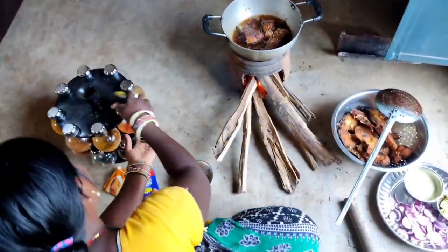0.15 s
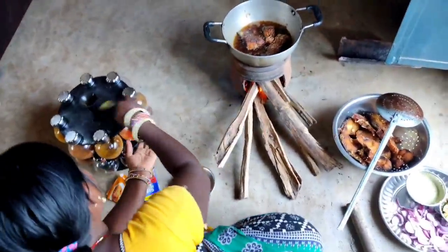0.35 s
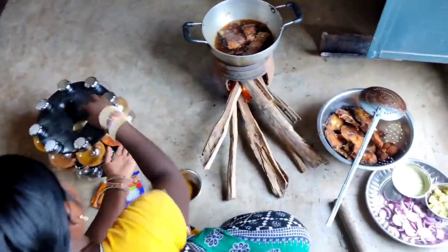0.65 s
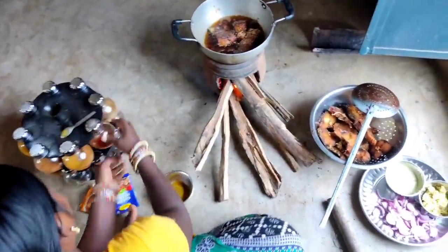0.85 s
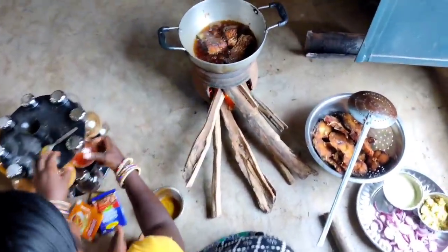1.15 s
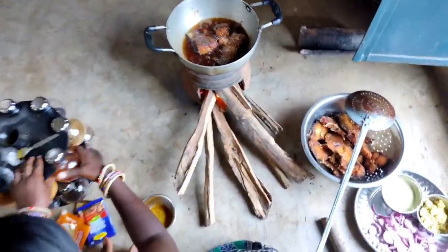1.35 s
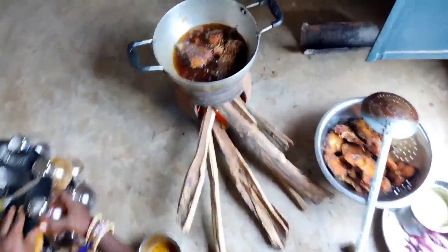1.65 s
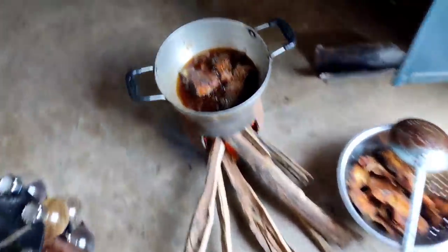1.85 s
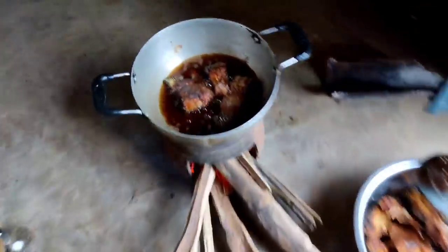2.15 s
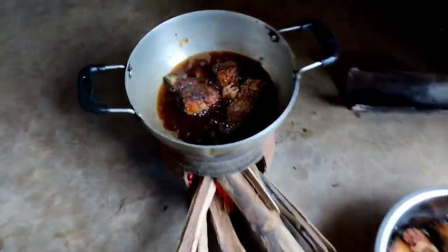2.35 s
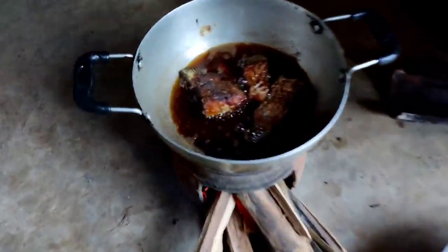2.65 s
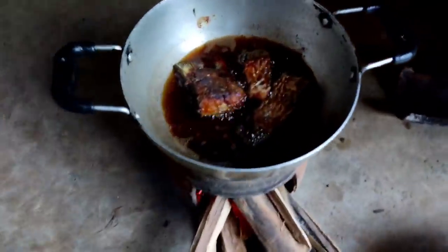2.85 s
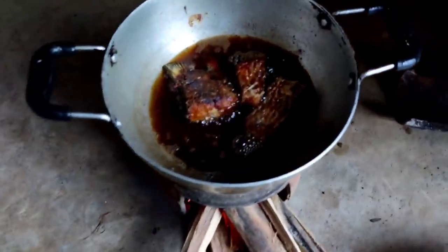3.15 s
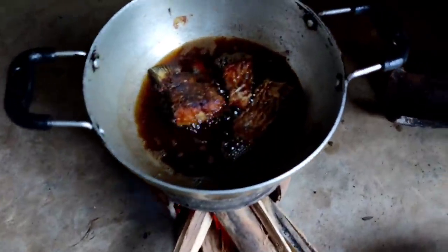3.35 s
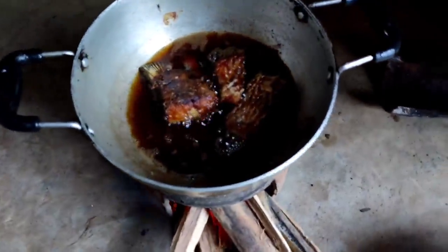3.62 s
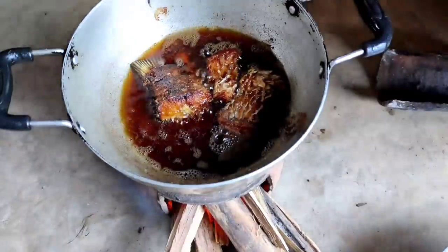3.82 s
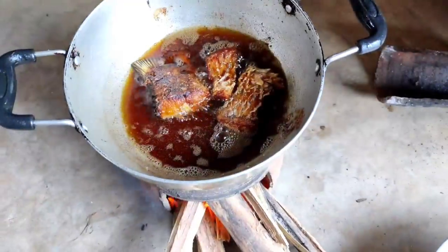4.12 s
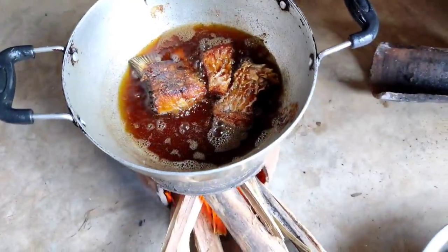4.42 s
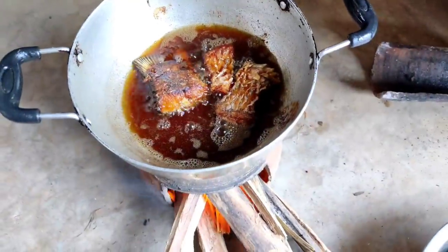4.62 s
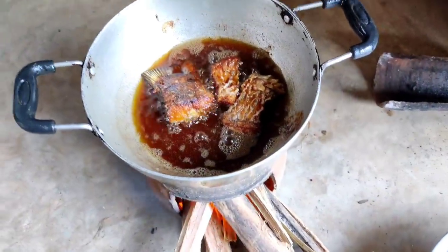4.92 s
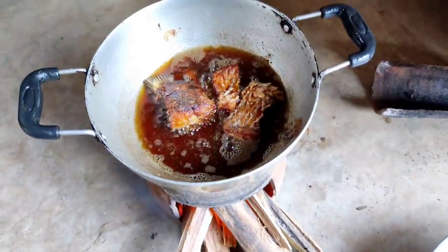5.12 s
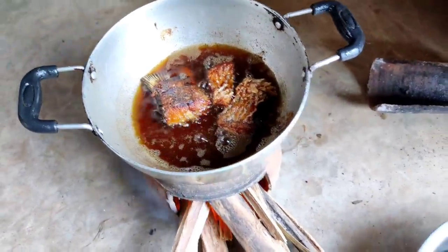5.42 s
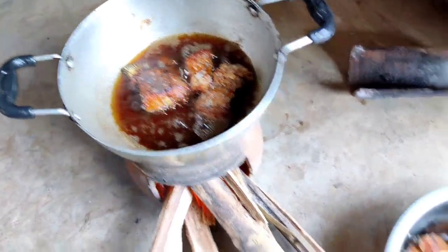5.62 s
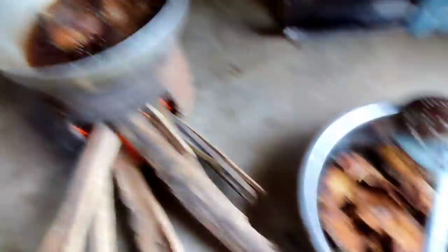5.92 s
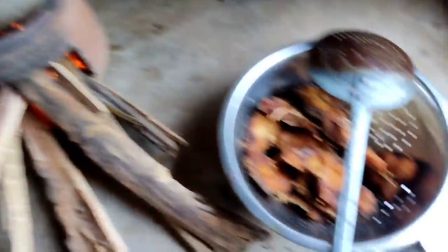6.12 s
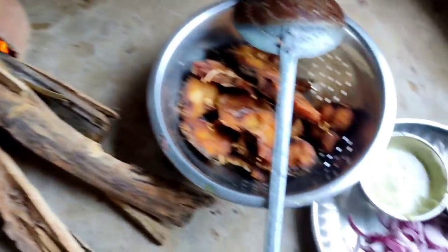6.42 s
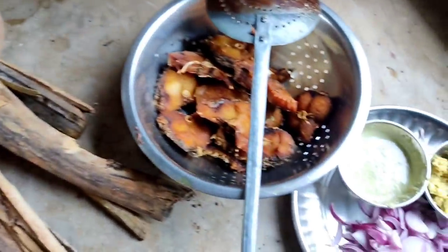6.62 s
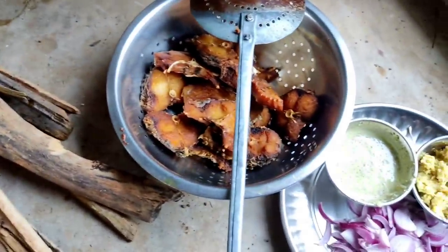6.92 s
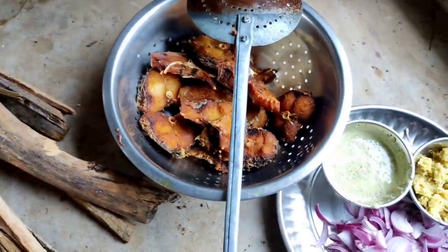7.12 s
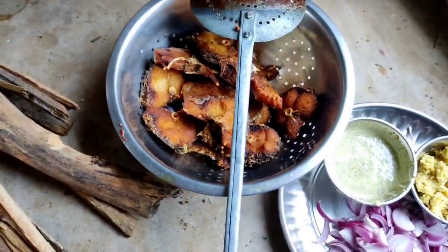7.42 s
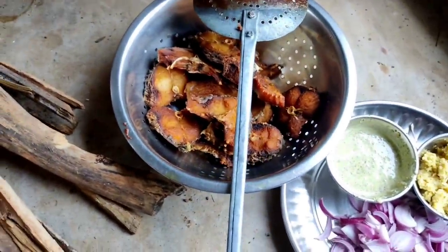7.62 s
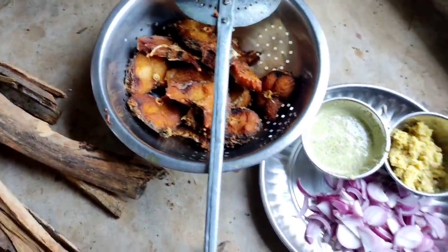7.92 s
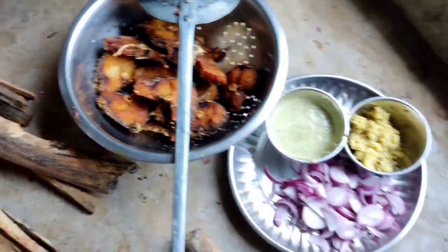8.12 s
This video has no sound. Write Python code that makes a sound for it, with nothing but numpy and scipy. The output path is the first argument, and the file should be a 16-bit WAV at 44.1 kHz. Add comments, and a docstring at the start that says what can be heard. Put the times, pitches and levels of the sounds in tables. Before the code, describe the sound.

Fish fries in a pot of hot oil, with a fine fizz, crackle and single bubbles popping throughout. Steel spice tins clink and rattle nearby in the first couple of seconds. The wood fire snaps three times, and a steel dish is faintly tapped near the end. The hand-held microphone moves closer to the pot and away in a bare kitchen, catching low puffs of air on the left midway.

```python
"""A bare kitchen: fish fries in a pot of hot oil, with fine fizz, crackle and single bursting bubbles.
The wood fire snaps. Steel spice tins clink and rattle nearby; a steel dish is touched.
A hand-held recorder with two spaced ports moves closer to the pot and away again.
Moving air buffets the left port, over a low murmur of fire and house."""
import sys
import numpy as np
from scipy import signal
from scipy.io import wavfile
from scipy.ndimage import uniform_filter1d, map_coordinates

SR = 44100
rng = np.random.default_rng(int(sys.argv[2]) if len(sys.argv) > 2 else 0)


def transcribe(u):
    """Save the signal u as a 16-bit wav file named by the first command-line argument.

    u: samples, shape (n,) or (channels, n), limited to [-1, 1]; the rate is SR.
    q: integer samples, one column per channel.
    """
    v = np.clip(np.atleast_2d(u).T, -1, 1)
    q = np.round(v * 32767).astype(np.int16)
    wavfile.write(sys.argv[1], SR, q)


N = 364354

# Spectra. Each row: frequency in Hz, relative density in dB.
ROOM_TONE_SPECTRUM = [(12, -47), (20, 19.5), (59, -4), (122, -12), (187, -0.5), (333, -4.5), (529, 0.5),
                      (749, -12.5), (1440, -20.5), (2600, -19.5), (4400, -120)]
WOOD_SPECTRUM = [(300, -9), (1500, -1), (3000, -6.5), (5000, -5), (7700, 14), (10000, 6), (13000, 3),
                 (16000, 11.5)]
CLATTER_SPECTRUM = [(500, -21), (900, -19), (1400, 5), (2800, -0.5), (4300, -6.5), (5700, -8.5), (7500, -4),
                    (9300, -10), (15500, -37)]
FIZZ_SPECTRUM = [(500, -38), (900, -16), (1700, -37), (2500, -0.5), (3300, -4.5), (4800, -3.5),
                 (6000, -4.5), (7700, 5.5), (9100, -1), (12000, -7), (15500, -46)]
CRACKLE_SPECTRUM = [(250, -56), (500, 2), (1100, -10.5), (2300, -6), (3500, -6), (5500, -7), (7700, 2),
                    (9200, 0), (15500, -30)]
SLAP_SPECTRUM = [(500, -6.5), (1000, 2.5), (2200, 7), (4000, -3), (6000, -11), (12000, -32)]
SPIT_SPECTRUM = [(3000, -45), (5000, -24), (6500, -10), (7700, 0), (8800, -5), (11000, -15), (16000, -30)]

# Air on the left port. Each row: time in seconds, rumble level in dB.
RUMBLE_LEVEL = [(0.0, -56), (0.85, -62), (1.1, -58.5), (2.51, -34.5), (2.64, -50), (2.92, -24), (3.01, -40),
                (3.26, -46), (4.51, -29), (4.71, -36.5), (5.17, -32), (5.52, -48.5), (5.71, -36.5),
                (5.86, -40), (6.03, -27.5), (6.26, -48), (6.37, -33.5), (6.65, -52.5), (8.26, -55.5)]
# Single eddies. Each row: start in seconds, level in dB, nominal pitch in Hz, t60 in seconds.
BUFFETS = [(1.901, -32, 167, 0.94), (1.97, -11.5, 134.6, 0.064), (2.135, -14, 280, 0.025),
           (2.256, -15, 188, 0.071), (2.385, -18.5, 208, 0.27), (2.499, -20, 174, 0.11),
           (2.793, -20, 204, 0.12), (2.894, -10.5, 148, 0.075), (3.916, -12, 141, 0.066),
           (4.305, -25, 200, 0.1), (4.415, -19, 223, 0.5), (4.459, -13.5, 194, 0.19),
           (4.641, -10.5, 256, 0.15), (4.841, -25, 166.5, 0.15), (4.969, -12, 198, 0.1),
           (5.189, -12, 195, 0.1), (5.336, -12, 229, 0.072), (5.718, -15, 165, 0.12),
           (6.025, -2.5, 207.5, 0.064), (6.338, -30.5, 185, 0.23)]
# Burning wood. Each row: start in seconds, peak in dB, left minus right in dB.
WOOD_SNAPS = [(2.4211, -8.5, -22.5), (4.701, -11, 18), (6.1089, 3, -10)]
# Touches on the dish. Each row: start in seconds, rim level in dB, belly level in dB.
DISH_TAPS = [(7.188, -37, -55), (7.218, -31, -59), (7.91, -43, -48), (7.945, -39, -41), (8.228, -35, -69)]
# Dish modes. Each row: frequency in Hz, t60 in seconds.
DISH_RIM, DISH_BELLY = [(2400, 0.038)], [(330, 0.21), (400, 0.14)]
# Tins knocked. Each row: start in seconds, level in dB, relative tray drive in dB,
# left minus right in dB, relative steel drive in dB, tick pitch in Hz.
TIN_KNOCKS = [(0.6695, -31, 2, -4, -3, 7600), (0.7158, -9.5, -10, -2, 1, 7000),
              (0.7328, -18, -9, 6, 2, 2800), (0.8358, -24, -23, 1, -4, 2800),
              (1.3326, -34, -6, -7, 0, 4000), (1.4095, -22, 6, -8, -7, 7400),
              (1.4723, -28, 14, -1.5, -15, 2800), (2.1302, -20, -1, -2, -34, 2300),
              (2.1501, -17.5, 8.5, 0, -26, 2100), (2.2007, -37.5, 23.5, 4, -10, 2000)]
# Tins rattling on. Each row: start in seconds, level in dB, t60 in seconds, relative tray drive in dB.
TIN_RATTLES = [(0.669, -43, 0.07, 25), (0.714, -30.5, 0.089, 9.5), (0.772, -38, 0.49, 6),
               (1.331, -35, 0.2, -2), (1.408, -47.5, 0.89, 10.5), (2.127, -29, 0.21, 8),
               (2.2, -52, 4.3, 13.5)]
# Steel modes. Each row: frequency in Hz, weight in dB, nominal ring time in seconds.
TIN_MODES = [(1490, -9, .1), (2830, -3, .1), (3332, -15, .2), (4237, -11, .08), (4899, -12, .12),
             (5491, -4, .2), (6150, -8, .08), (6638, -7, .11), (6907, -2.5, .36), (7499, -10, .2),
             (7741, -9, .2), (8296, -6, .1), (8770, -10, .14), (9373, -12, .3), (10220, -4, .3),
             (11050, -5, .3), (14200, -17, .2)]
# Tray under the tins. Each row: frequency in Hz, width in Hz, gain in dB.
TRAY_MODES = [(190, 70, -10), (260, 50, -10), (465, 70, -9), (528, 60, -1), (705, 90, -10), (850, 120, -11)]
# Fizz as the recorder moves. Each row: time in seconds, level in dB.
FIZZ_LEVEL = [(0, -56.5), (1, -55), (1.8, -57), (2.6, -56.5), (3.5, -53.5), (4.3, -57), (5, -59),
              (5.6, -58), (6.5, -60), (7.4, -60), (8.26, -55.5)]
# Crackle flurries as water boils out of the fish. Each row: start in seconds, level in dB, t60 in seconds.
SPATTERS = [(2.885, -24.5, 0.12), (6.2, -46, 0.63), (6.49, -42, 0.32), (7.91, -52, 0.87), (8.2, -55, .4)]
# Bursting bubbles. Each row: start in seconds, ring peak in dB, ring pitch in Hz, slap peak in dB,
# spit peak in dB, left minus right in dB.
BURSTS = [(0.058, -32, 2000, -27.5, -51, -2), (0.256, -28.5, 5000, -31.5, -30, -2),
          (0.344, -41.5, 614, -39, -26, 4), (0.413, -34, 1680, -27.5, -40, -3),
          (0.468, -31.5, 495, -59, -57, 7), (0.945, -50, 549, -28.5, -36, -1),
          (1.065, -31, 1790, -35.5, -44, 2), (1.141, -31, 1490, -27.5, -33, 3.5),
          (1.235, -27, 2440, -30.5, -49, 2), (1.317, -29, 1790, -27, -33, -3),
          (1.543, -34.5, 590, -28, -26.5, -5), (1.616, -47, 1760, -24.5, -33, -5.5),
          (1.675, -19.5, 1400, -19.5, -36, -0.5), (1.733, -27.5, 1950, -24.5, -31.5, -6.5),
          (2.092, -31, 1490, -48, -60, 2), (2.261, -32, 5070, -25.5, -32, 2),
          (2.422, -26.5, 470, -24, -28, -14.5), (2.515, -27, 1980, -34, -50, 5),
          (2.53, -19.5, 1740, -29, -33.5, -1), (2.584, -40, 574, -27.5, -31, 7),
          (2.653, -37, 2500, -30, -36, 7), (2.698, -20, 1520, -34, -50, -1.5),
          (2.719, -38, 2090, -26, -39, -2), (2.883, -16.5, 2080, -23, -30, 0),
          (2.9, -15.5, 2120, -21.5, -16.5, -4), (2.915, -13, 1920, -17.5, -22, 1),
          (2.983, -36, 1290, -24, -52, -2), (2.995, -24, 440, -29, -40, 4.5),
          (3.041, -42, 875, -35, -28.5, -8), (3.159, -26, 443, -28, -52, 5.5),
          (3.267, -40, 417, -31, -31, -1), (3.298, -30.5, 990, -28, -52, 3), (3.42, -34, 1510, -25, -37, 0),
          (3.426, -33, 2000, -21, -23, -1), (3.481, -30.5, 1066, -19.5, -56, -2),
          (3.515, -34, 420, -23.5, -48, 2), (3.62, -62, 477, -53, -23.5, 9),
          (3.672, -18, 1750, -22.5, -36, -2.5), (3.774, -26.5, 3500, -31, -29.5, -4.5),
          (3.835, -36.5, 705, -37, -35, 4), (3.896, -30, 2240, -27.5, -49, 3),
          (3.93, -30, 2350, -49, -42, -13), (3.974, -16.5, 1730, -19.5, -29, -0.5),
          (4.043, -28.5, 430, -31, -38, 7), (4.105, -31.5, 520, -25.5, -49, 4),
          (4.167, -31, 2840, -26.5, -31, -9.5), (4.249, -64, 630, -36.5, -29, -9),
          (4.324, -39, 503, -26.5, -28, 0), (4.386, -29.5, 2760, -39, -28, -8),
          (4.4, -28, 674, -13.5, -47, 0), (4.45, -24.5, 1760, -36, -50, -5),
          (4.522, -27, 2770, -30, -34, -5), (4.688, -32.5, 1220, -33, -39, -6),
          (4.701, -33, 494, -22, -22, -1), (4.787, -21.5, 1340, -24, -31, -6.5),
          (4.799, -28.5, 1880, -29, -39.5, 16.5), (4.927, -35.5, 2000, -47, -54, -9),
          (5.081, -22, 647, -28, -29.5, 6), (5.099, -32, 890, -40, -42.5, -5),
          (5.159, -55, 640, -24, -20, 6), (5.286, -37, 520, -29, -38, -7),
          (5.329, -41, 454, -26, -33, -3.5), (5.383, -53, 2000, -45, -30, -3),
          (5.484, -24, 4930, -49, -20, 4), (5.497, -30, 1460, -28.5, -37, -3),
          (5.659, -39, 700, -25.5, -31, 2), (5.669, -31, 2220, -38, -40, -18),
          (5.734, -25.5, 1570, -25.5, -34, -3), (5.746, -22, 2160, -25, -17.5, 0),
          (5.804, -39.5, 500, -25, -29, 3), (5.974, -32.5, 4200, -31, -41, -6.5),
          (6.108, -37, 2020, -24, -15, 1.5), (6.154, -29.5, 2100, -44, -39, -7),
          (6.211, -36, 2300, -31, -27, -2), (6.237, -35.5, 790, -28.5, -28, -2),
          (6.398, -38, 1990, -34.5, -49, -7), (6.488, -26.5, 2000, -29, -38, -3),
          (6.493, -24.5, 486, -49, -42, 0.5), (6.534, -35.5, 560, -26, -40, -2),
          (6.651, -34.5, 855, -36.5, -52, 2), (6.689, -37, 525, -30, -37, -2.5),
          (6.797, -38.5, 3640, -41, -32, -4), (6.824, -38, 2680, -34, -32, -3),
          (6.882, -35.5, 5840, -36, -48, -3), (6.981, -33.5, 1810, -35, -42, -2),
          (7.088, -43, 520, -29.5, -36, 2), (7.187, -28.5, 1900, -28, -28.5, -3),
          (7.303, -36, 2730, -35, -36.5, 0), (7.388, -38, 526, -26.5, -24.5, -3.5),
          (7.548, -44, 550, -67, -26.5, 8), (7.639, -34.5, 543, -31.5, -35, 1),
          (7.909, -35, 440, -30, -39, 2), (7.942, -31, 3050, -29.5, -47, -8),
          (7.999, -37, 1980, -24, -25, -2), (8.085, -34, 610, -33.5, -40, 5),
          (8.22, -30, 2280, -25, -34, -1)]

# Distance from the pot, heard as echo. Each row: time in seconds, echo offset in dB.
DISTANCE_ECHO = [(0, 3.5), (1.8, -1.5), (5.6, 1), (6.3, 6.5), (8.26, 3)]
# Kitchen decay. Each row: frequency in Hz, t60 in seconds.
KITCHEN_T60 = [(300, 0.35), (1500, 0.28), (5000, 0.31), (10000, 0.25)]
# Arrival at the ports. Each row: time in seconds, left delay in ms.
PORT_LAG = [(0, 0.039), (.75, 0.26), (1.7, 0.14), (2.2, 0.46), (3.0, 0.13), (5.7, 0.17), (6.3, 0.39),
            (8.3, 0.44)]
# Shading by the recorder's body. Each row: frequency in Hz, left minus right in dB.
PORT_SHADING = [(300, 0), (1300, 3.5), (2400, -1.5), (4400, -7), (8000, -5.5), (15000, 15.5)]
# Treble loss of the ports. Each row: frequency in Hz, gain in dB.
PORT_RESPONSE = [(9300, 2), (9800, -8.5), (11000, -10), (15000, -16.5)]


def amp(db):
    """Decibels to gain."""
    return 10 ** (np.asarray(db) / 20)


def unit_rms(x):
    """Scales to rms 1."""
    return x / np.sqrt(np.mean(x ** 2) + 1e-20)


def unit_peak(x):
    """Scales to peak 1."""
    return x / abs(x).max()


def at_hz(points, hz):
    """Table lookup on a log frequency axis."""
    points_hz, value = np.transpose(points)
    return np.interp(np.log(hz + 1), np.log(points_hz + 1), value)


def curve(points):
    """Time table to one value a sample."""
    return np.interp(np.arange(N) / SR, *np.transpose(points))


def add(mix, start_s, sound):
    """Mixes a sound in, in place."""
    part = mix[..., round(start_s * SR):][..., :sound.shape[-1]]
    part += sound[..., :part.shape[-1]]


def panned(x, pan_db):
    """Left and right pair; positive is left."""
    return amp(np.array([[pan_db], [-pan_db]]) / 2) * x


def coloured(x, spectrum, size=4096):
    """Minimum-phase filter with the given spectrum."""
    gain_db = np.maximum(at_hz(spectrum, abs(np.fft.fftfreq(size, 1 / SR))), -100)
    response = np.exp(np.conj(signal.hilbert(np.log(amp(gain_db)))))
    taps = np.fft.ifft(response).real[:size // 2]
    return signal.oaconvolve(x, taps.reshape((1,) * (x.ndim - 1) + (-1,)), axes=-1)[..., :x.shape[-1]]


def resonate(x, hz, width_hz):
    """Two-pole resonance of gain near 1."""
    r = np.exp(-np.pi * width_hz / SR)
    return signal.lfilter([1 - r, 0, r - 1], [1, -2 * r * np.cos(2 * np.pi * hz / SR), r * r], x)


def wander(rate_hz):
    """Slow random drift of rms 1."""
    return unit_rms(signal.sosfilt(signal.butter(2, rate_hz, fs=SR, output="sos"), rng.standard_normal(N)))


def clicks(per_s, spread_db):
    """Sparse clicks of random sign; a few are large."""
    size = amp(spread_db * np.minimum(rng.exponential(1, N), 3)) * rng.choice([-1., 1.], N)
    return size * (rng.random(N) < per_s / SR)


def swell_decay(db, t60_s, rise_s):
    """One second of gain: fast rise, exponential fall."""
    t = np.arange(SR) / SR
    return amp(db - 60 * t / t60_s) * (1 - np.exp(-t / rise_s))


def room_tone(level_db=-52.5):
    """Low murmur of fire and house, partly alike on both ports."""
    shared, left, right = rng.standard_normal((3, N))
    murmur = np.array([shared + .5 * left, shared + .5 * right]) * amp(1.5 * wander(8))
    return amp(level_db) * unit_rms(coloured(murmur, ROOM_TONE_SPECTRUM))


def air(flutter_db=-4, wobble_turns=.3):
    """Low turbulence, unrelated on the two ports; buffets on the left sag in pitch as each eddy slows."""
    rumble = rng.standard_normal((2, N))
    rumble = unit_rms(coloured(rumble, [(12, -40), (25, 6.5), (70, -1.5), (130, -19.5), (400, -53)]))
    flutter = rng.standard_normal(N)
    flutter = unit_rms(coloured(flutter, [(60, 1), (110, -6), (180, -.5), (300, -16.5), (600, -41.5)]))
    left_db = curve(RUMBLE_LEVEL)
    left = amp(left_db + 3 * wander(26)) * (rumble[0] + amp(flutter_db + 3.5 * wander(9)) * flutter)
    t = np.arange(5000) / SR
    wobble = wobble_turns * wander(33.6)
    for start_s, db, hz, t60_s in BUFFETS:
        turns = hz * (0.579 * t + 0.703 * 0.0124 * (1 - np.exp(-t / 0.0091)))
        turns += wobble[round(start_s * SR):][:len(t)]
        add(left, start_s, swell_decay(db, t60_s, rise_s=.0042)[:len(t)] * np.sin(2 * np.pi * turns))
    right = amp(0.54 * left_db - 33.5 + wander(26)) * rumble[1]
    return np.array([left, right])


def wood_snaps(tear_gain=.12, tear_s=.0004):
    """Burning wood: a hard click inside a ragged tear, no ring."""
    out, t = np.zeros((2, N)), np.arange(600) / SR
    click = t == t[30]
    tear = tear_gain * np.exp(-((t - t[30]) / tear_s) ** 2)
    for start_s, db, pan_db in WOOD_SNAPS:
        snap = coloured(click + rng.standard_normal(len(t)) * tear, WOOD_SPECTRUM)
        add(out, start_s, panned(amp(db) * unit_peak(snap), pan_db))
    return out


def dish():
    """Each tap rings rim and belly by its own amounts."""
    out, t = np.zeros((2, N)), np.arange(SR // 4) / SR
    rim, belly = (sum(amp(-60 * t / t60_s) * np.sin(2 * np.pi * hz * t) for hz, t60_s in modes)
                  for modes in (DISH_RIM, DISH_BELLY))
    for start_s, rim_db, belly_db in DISH_TAPS:
        add(out, start_s, amp(rim_db) * rim + amp(belly_db) * belly)
    return out


def tins(length_s=3, knock_rise_s=.0006, knock_fall_s=.0016, rattle_stop_s=.2, rattle_ring_db=-27):
    """Knocks and rattling contacts drive a broad clatter, the steel modes and a low tray body."""
    length = length_s * SR
    clatter, tray_drive, steel_drive, ticks = np.zeros((4, 2, length))
    t = np.arange(400) / SR
    for start_s, db, tray_db, pan_db, ring_db, tick_hz in TIN_KNOCKS:
        noise = rng.standard_normal((2, len(t)))
        knock = noise * amp(db) * (1 - np.exp(-t / knock_rise_s)) * np.exp(-t / knock_fall_s)
        blow = (t == 0) + .07 * noise[0] * np.exp(-t / .0004)  # each lands elsewhere
        add(clatter, start_s, panned(knock * amp(-7), pan_db))
        add(ticks, start_s, panned(resonate(knock, tick_hz, tick_hz / 2), pan_db))
        add(tray_drive, start_s, knock[0] * amp(tray_db))
        add(steel_drive, start_s, panned(amp(db + ring_db) * blow, pan_db))
    contacts = np.array([unit_rms(clicks(per_s=2500, spread_db=2.5)) for _ in range(2)])
    hand_damping = np.exp(-(np.arange(SR) / SR / rattle_stop_s) ** 4)
    for start_s, db, t60_s, tray_db in TIN_RATTLES:
        envelope = swell_decay(db, t60_s, rise_s=.003) * hand_damping
        rattle = contacts[:, round(start_s * SR):][:, :SR] * envelope
        add(clatter, start_s, rattle)
        add(steel_drive, start_s, rattle * amp(rattle_ring_db))
        add(tray_drive, start_s, (rattle[0] + 0.16 * rattle) * amp(tray_db))
    steel_drive += 1e-12
    tray_drive += 1e-12 * contacts[:, :length]
    ring = sum(amp(db) * ring_s * resonate(steel_drive, hz, 2.9 / ring_s) for hz, db, ring_s in TIN_MODES)
    tray = sum(amp(db) * resonate(resonate(tray_drive, hz, width_hz), hz, 4 * width_hz)
               for hz, width_hz, db in TRAY_MODES)
    ring *= amp(55 + 1.5 * wander(30)[:length])  # touching tins jangle
    out = amp(11) * (coloured(clatter, CLATTER_SPECTRUM) + ticks) + ring + amp(20) * tray
    return np.pad(out, ((0, 0), (0, N - length)))


def seethe(x, depth_db):
    """Level patches drift over time and pitch as parts of the oil seethe and settle."""
    bins = signal.stft(x, nperseg=256)[2]
    patches = uniform_filter1d(rng.standard_normal(bins.shape[1:]), size=8, axis=0)
    patches = uniform_filter1d(patches, size=14, axis=1)
    return signal.istft(bins * amp(depth_db * unit_rms(patches)), nperseg=256)[1][:, :N]


def fizz():
    """Dense tiny bubbles: clicks in hiss."""
    grains = unit_rms(clicks(per_s=700, spread_db=3.2))
    hiss = grains + .8 * rng.standard_normal((2, N))
    hiss *= amp(2.5 * wander(11))  # the oil spits in clusters
    hiss *= amp(2 * wander(79))
    return amp(curve(FIZZ_LEVEL)) * unit_rms(seethe(coloured(hiss, FIZZ_SPECTRUM), depth_db=2))


def bubble(hz, t60_cycles, glide_per_s=0.33):
    """Short ring: swells in one cycle, rises in pitch as the bubble opens."""
    t = np.arange(2000) / SR
    swell = 1 - np.exp(-(t * hz / .8) ** 2)
    decay = amp(-60 * t * hz / t60_cycles)
    return unit_peak(decay * swell * np.sin(2 * np.pi * hz * t * (1 + glide_per_s * t)))


def crackle(over_fizz_db=-2.5):
    """Clumps of small bubbles at many pitches and places in the pot, with spatter flurries."""
    gain = amp(curve(FIZZ_LEVEL) + over_fizz_db)
    for start_s, db, t60_s in SPATTERS:
        add(gain, start_s, swell_decay(db, t60_s, rise_s=.0037))
    out = np.zeros((2, N))
    for hz, pan_db in zip(np.geomspace(450, 9000, num=18), rng.normal(0, 10.5, 18)):
        grain = bubble(hz, t60_cycles=9 + hz / 400) * np.sqrt(hz)
        out += panned(signal.oaconvolve(clicks(per_s=9, spread_db=1.8), grain)[:N], pan_db)
    out *= amp(3 * wander(9))
    return gain * unit_rms(coloured(out, CRACKLE_SPECTRUM))


def plops():
    """Clumps of round, wet, mid-pitched bubbles at the level of the fizz."""
    out = np.zeros((2, N))
    for hz, pan_db in zip(np.geomspace(800, 3200, num=14), rng.normal(0, 12.5, 14)):
        grain = bubble(hz, t60_cycles=12, glide_per_s=3)
        out += panned(signal.oaconvolve(clicks(per_s=6, spread_db=2.5), grain)[:N], pan_db)
    return amp(curve(FIZZ_LEVEL)) * unit_rms(out * amp(4 * wander(7)))


def bursting_bubbles(pot_t60_s=.04):
    """Each burst: a bubble ring, the slap of oil closing, a sharp spit, an echo off the pot walls."""
    out, t = np.zeros((2, N)), np.arange(2000) / SR
    rupture = np.exp(-((t - .001) / .0007) ** 2)
    rupture += .4 * (1 - np.exp(-t / .001)) * np.exp(-t / .002)  # tears on for a few ms
    wall_decay = amp(-60 * t / pot_t60_s) * (t > .001)
    echo_db = curve(DISTANCE_ECHO) - 7
    for start_s, ring_db, hz, slap_db, spit_db, pan_db in BURSTS:
        noise = rng.standard_normal((5, len(t)))  # one shared, two per port
        jolt = (noise[0] + .5 * noise[1:3]) * rupture
        burst = amp(ring_db) * bubble(hz, t60_cycles=5 + .0035 * hz)
        burst = burst + amp(slap_db) * unit_peak(coloured(jolt, SLAP_SPECTRUM))
        burst += amp(spit_db) * unit_peak(coloured(jolt, SPIT_SPECTRUM))
        echo = signal.oaconvolve(burst, noise[3:] * wall_decay, axes=1)[:, :len(t)]
        echo *= amp(echo_db[round(start_s * SR)]) * np.linalg.norm(burst) / np.linalg.norm(echo)
        add(out, start_s, panned(burst + echo, pan_db))
    return out


def kitchen(x):
    """Reverb: sparse reflections of random sign, each band with its own decay."""
    taps = np.zeros((2, SR // 2))
    slots = np.arange(200, SR // 2 - 20, 20)
    arrivals = slots + rng.integers(0, 20, (2, len(slots)))
    np.put_along_axis(taps, arrivals, rng.choice([-1., 1.], arrivals.shape), 1)
    hz, t, bins = signal.stft(taps, SR, nperseg=256)
    tail = signal.istft(bins * amp(-60 * t / at_hz(KITCHEN_T60, hz)[:, None]), SR, nperseg=256)[1]
    return signal.oaconvolve(x, tail / np.linalg.norm(tail[0]), axes=1)[:, :N]


def ports(x):
    """The left port hears later; the recorder's body shades the two differently."""
    delayed = map_coordinates(x[0], [np.arange(N) - curve(PORT_LAG) * SR / 1000], order=3)
    left = coloured(delayed, [(hz, db / 2) for hz, db in PORT_SHADING])
    right = coloured(x[1], [(hz, -db / 2) for hz, db in PORT_SHADING])
    return np.array([left, right])


def scene():
    """Pot and steel arrive from the side; wood snaps reach both ports at once, each louder on one side."""
    frying = fizz() + crackle() + plops()
    bursts = bursting_bubbles()
    steel = tins() + dish()
    snaps = wood_snaps()
    burst_send_db = curve(DISTANCE_ECHO) - 8.5
    reverb = kitchen(amp(-4) * (frying + steel) + amp(burst_send_db) * bursts + amp(-19) * snaps)
    return ports(frying + bursts + steel + reverb) + snaps + air() + room_tone()


def record(dry, ceiling=.9, cutoff_hz=15900):
    """Treble loss of the ports, the loudest peaks gently rounded, band limit."""
    clipped = ceiling * np.tanh(coloured(dry, PORT_RESPONSE) / ceiling)
    lowpass = signal.firwin(511, cutoff_hz, window=("kaiser", 9), fs=SR)
    return signal.oaconvolve(clipped, lowpass[None], "same")


dry = scene()
out = record(dry)
transcribe(out)
```